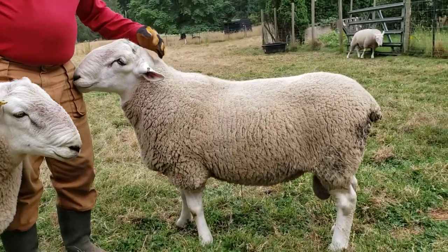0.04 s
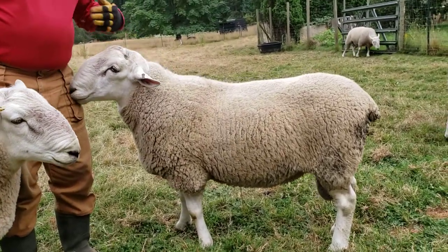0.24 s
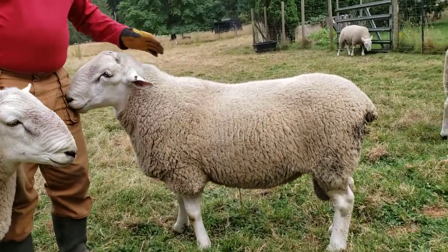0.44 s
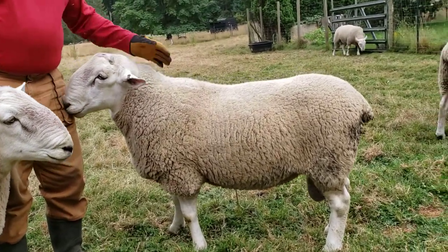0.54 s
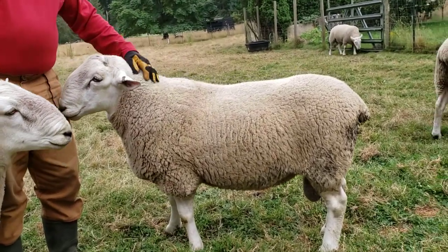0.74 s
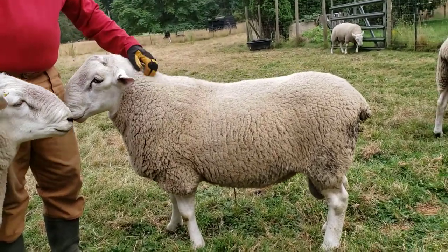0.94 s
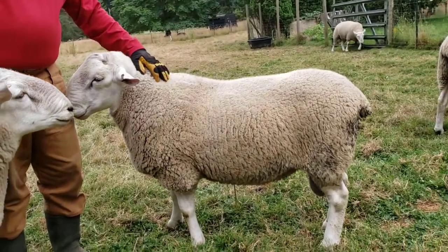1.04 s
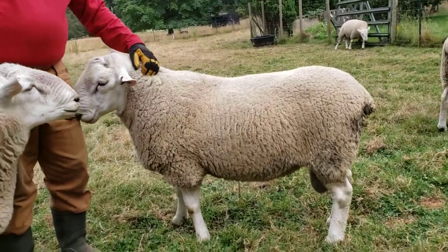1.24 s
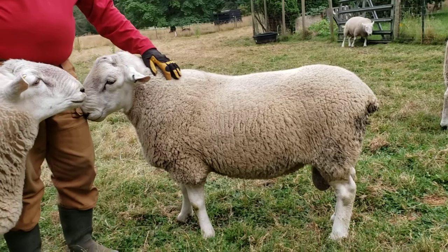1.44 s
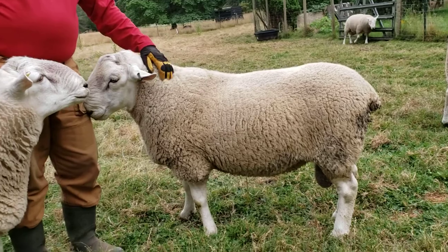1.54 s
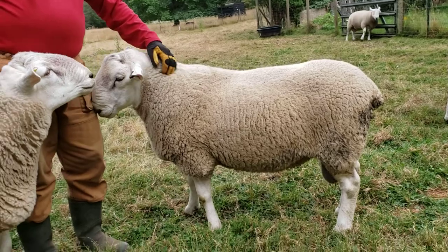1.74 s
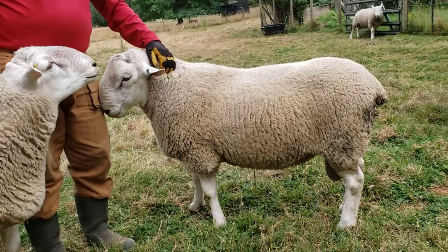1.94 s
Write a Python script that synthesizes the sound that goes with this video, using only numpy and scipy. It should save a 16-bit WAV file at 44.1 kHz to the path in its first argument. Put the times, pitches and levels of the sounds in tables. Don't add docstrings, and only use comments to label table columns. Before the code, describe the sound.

A few metres from a phone in a pasture, pellets rattle in a jostled bucket: one sharp jolt, a quiet gap, another short burst, a tiny tag tick, a hoof click and a faint final slide.

```python
import sys
import numpy as np
from scipy import signal
from scipy.fft import rfft, irfft, next_fast_len
from scipy.io import wavfile
from scipy.ndimage import uniform_filter1d

SR = 44100
rng = np.random.default_rng(int(sys.argv[2]) if len(sys.argv) > 2 else 0)


def digitize_waveform(pressure):
    field = np.atleast_2d(pressure).T
    bounded = np.clip(field, -1, 1)
    quanta = np.round(bounded * 32767).astype(np.int16)
    wavfile.write(sys.argv[1], SR, quanta)


def undo_db(level):
    steps = np.asarray(level, float) / 20
    return 10 ** steps


N = 88200
M = next_fast_len(2 * N)
F = np.maximum(np.arange(M // 2 + 1) * SR / M, 1)

# (frequency [Hz], left over right [dB], left lead [rad], likeness [0-1])
PORTS = [(150, -1.8, -.1, .85), (750, -1.5, -.2, .95), (1150, 7.5, -.5, .85), (1650, 2.5, -1.9, .85),
         (2400, -4.5, -2.3, .85), (3700, -1, -1.9, .75), (5000, 4, -1.6, .5), (10300, 3, -4.1, .55),
         (13000, -5.5, -4.7, .45)]


def unit(x):
    return x / np.sqrt(np.mean(x ** 2))


def curve(table, col=1):
    a = np.array(table, float)
    return np.interp(np.log(F), np.log(a[:, 0]), a[:, col])


def shape(x, h):
    return irfft(rfft(x, M) * h, M)[..., :N]


def ring(modes):
    h = 0
    for k, (hz, width_hz, db) in enumerate(modes):
        h = h + (-1) ** k * undo_db(db) / (1 + 1j * (F - hz ** 2 / F) / max(width_hz, 10))
    return unit(np.abs(h)) * np.exp(1j * np.angle(h))


def walk(rate_hz):
    k = int(SR / rate_hz)
    steps = np.repeat(rng.standard_normal(N // k + 1), k)
    return unit(uniform_filter1d(uniform_filter1d(steps, k), k)[:N])


def air_hiss(t):
    # (frequency [Hz], density [dB per Hz])
    hiss_db = [(200, -12.5), (690, -20), (1150, -12.5), (1810, -18.5), (5600, -19), (7600, -17.5),
               (9600, -31.5), (14500, -24.5)]
    hiss = 0
    for hz in 250 * 2 ** np.arange(0, 6.5, .5):
        band = undo_db(curve(hiss_db)) * np.exp(-(np.log2(F / hz) / 0.5) ** 2)
        hiss = hiss + shape(rng.standard_normal((3, N)), band) * undo_db(1.46 * walk(5.83))
    hiss = hiss[1:] + shape(hiss[0], 500 / (F + 200))
    lull_s, lull_half_s, lull_db = 1.02, 0.19, -5
    return undo_db(-68.5 + lull_db * np.exp(-((t - lull_s) / lull_half_s) ** 2)) * unit(hiss)


def rumble():
    # (frequency [Hz], density [dB per Hz])
    rumble_db = [(12, -41), (20, -66), (37, -12.5), (80, -5), (109, -3.5), (141, -11), (198, -13),
                 (225, -22.5), (400, -36), (520, -64), (880, -120)]
    level_db, side_db = -62, -11
    mid, side = shape(rng.standard_normal((2, N)), undo_db(curve(rumble_db)) * np.exp(-(F / 500) ** 2))
    both = mid * np.array([[.9], [1.1]]) + undo_db(side_db) * side * np.array([[1], [-1]])
    return undo_db(level_db) * unit(both)


def engine(t):
    # (time [s], frequency [Hz], level [dB])
    track = [(0.0, 90.3, -85), (0.099, 90.6, -54.5), (0.271, 87.2, -68), (0.29, 82.8, -65),
             (0.4, 87.28, -64), (1.35, 83.17, -64), (1.37, 83.4, -94), (1.42, 81.8, -54),
             (1.62, 83.44, -69.5), (1.699, 78.6, -63.5), (1.98, 78, -85), (2.0, 81, -67)]
    # (multiple of the drone [1], level [dB])
    partials = [(1, -1), (1.704, -11)]
    wobble_db, hum_hz, hum_db = 5, 229.4, -77.5
    s, hz, level_db = np.array(track).T
    turn = 2 * np.pi * np.cumsum(np.interp(t, s, hz) * (1 + 0.0184 * walk(8.6))) / SR
    drone = 0
    for k, db in partials:
        gain = undo_db(db + np.interp(t, s, level_db) + wobble_db * np.tanh(walk(22.3)))
        drone = drone + gain * np.sqrt(2) * np.sin(k * turn)
    hum = undo_db(hum_db + np.tanh(walk(10.2))) * np.sin(2 * np.pi * hum_hz * t + 0.91 * walk(3.1))
    return drone + hum


def pellets():
    pellets_per_s, scatter_db, sand = 3500, 2, 1.1
    draw = rng.random((3, N))
    size = undo_db(-scatter_db * np.log(draw[1] + 1e-9)) * np.sign(draw[2] - .5)
    return unit(unit(size * (draw[0] < pellets_per_s / SR)) + sand * rng.standard_normal(N))


def streams():
    clump_db, clumps_per_s = 2, 400
    return np.array([pellets() for _ in range(3)]) * unit(undo_db(clump_db * np.tanh(walk(clumps_per_s))))


def effort(t, table, col, t60_s, rise_s):
    power = 0
    for row in table:
        u = t - row[0]
        env = np.clip(u / rise_s, 0, 1) ** 2 * undo_db(-60 * np.clip(u - row[1], 0, None) / t60_s)
        power = power + (env * undo_db(row[col])) ** 2
    return np.sqrt(power)


def bucket(t):
    # (time [s], length [s], rattle [dB], shell [dB], hiss [dB])
    jolts = [(0.001, 0.031, -62.5, -62.5, -80), (0.084, 0.055, -65, -70, -69.5),
             (0.1403, 0.014, -34, -42.5, -38.5), (0.149, 0.016, -37, -38.5, -44),
             (0.168, 0.016, -35.5, -39.5, -44.5), (0.179, 0.0048, -56, -42, -59),
             (0.212, 0.03, -50.5, -50, -85), (0.243, 0.05, -51.5, -55, -61),
             (0.308, 0.083, -62.5, -77, -76), (0.396, 0.067, -58, -63, -76),
             (0.807, 0.019, -59.5, -62, -74.5), (0.837, 0.044, -70.5, -65.5, -80),
             (1.12, 0.018, -77.5, -115, -76), (1.186, 0.041, -66.5, -77, -74),
             (1.265, 0.023, -66, -76, -71), (1.28, 0.013, -57, -62.5, -52),
             (1.298, 0.035, -58.5, -60.5, -71), (1.3338, 0.014, -42, -47.5, -44),
             (1.379, 0.019, -38.5, -41, -46.5), (1.417, 0.0045, -38.5, -41.5, -43.5),
             (1.473, 0.012, -46.5, -49.5, -55.5), (1.53, 0.012, -58, -59, -61.5),
             (1.589, 0.17, -69, -73.5, -98), (1.792, 0.018, -62.5, -74, -78),
             (1.811, 0.16, -67.5, -71, -73.5)]
    release_t60_s = (.16, .2, .07)
    # (frequency [Hz], width [Hz], level [dB])
    rattle = [(2250, 300, -6.5), (2950, 150, -5), (3280, 200, -7), (3700, 500, -10), (4300, 350, -9),
              (4750, 300, -9), (5300, 250, -10), (5800, 300, -8), (6150, 250, -11), (6800, 400, -18),
              (7500, 450, -13)]
    # (frequency [Hz], width [Hz], level [dB])
    shell = [(420, 300, -25), (636.5, 42, -14.5), (813, 62, -7.5), (1091.5, 53, -1.5), (1274, 100, -2),
             (1325, 69, 0.5), (1464, 52, 1), (1566, 138, -1), (1825, 250, -5)]
    # (frequency [Hz], width [Hz], level [dB])
    hiss = [(9200, 2100, -8), (11680, 1650, 0.5), (13400, 910, 0.5), (13960, 1000, -9.5), (15100, 300, -2)]
    body = 0
    for k, modes in enumerate((rattle, shell, hiss)):
        drive = effort(t, jolts, 2 + k, release_t60_s[k], rise_s=0.0046)
        body = body + shape(streams() * drive, ring(modes))
    return body


def ports(x):
    dip_hz, dip_width_hz, dip = 2620, 200, .8
    alike = np.clip(curve(PORTS, col=3), 0, 1)
    half = undo_db(curve(PORTS) / 2) * np.exp(.5j * curve(PORTS, col=2))
    x = shape(x, 1 - dip * np.exp(-((F - dip_hz) / dip_width_hz) ** 2))
    return np.array([shape(x[0], g * np.sqrt(alike)) + shape(x[k], g * np.sqrt(1 - alike))
                     for k, g in ((1, half), (2, 1 / half))])


def echo(x, t):
    # (frequency [Hz], T60 [s], level [dB])
    bands = [(465, 0.16, -66), (1110, 1, 7.5), (2750, 0.78, 2), (3860, 0.91, 7.5), (6500, 1, -8.5),
             (9400, 0.99, 1), (14000, 0.15, 11.5)]
    level_db, start_s, likeness = -9.5, 0.0098, 0.094
    tail = 0
    for hz, t60_s, db in bands:
        band = shape(rng.standard_normal((3, N)), np.exp(-(np.log(F / hz) / .5) ** 2))
        env = undo_db(db - 60 * t / t60_s) * np.clip(t / start_s, 0, 1)
        tail = tail + unit(band) * np.sqrt(hz / t60_s) * env
    tail = likeness * tail[0] + tail[1:]
    side = undo_db(np.array([[1], [-1]]) * curve(PORTS) / 2)
    return undo_db(level_db) * shape(x, side * rfft(tail / np.sqrt(np.sum(tail ** 2) / 2), M))


def brushes(t):
    # (time of peak [s], half length [s], frequency [Hz], level [dB])
    swells = [(0.017, 0.069, 14000, -70), (0.471, 0.049, 10500, -69.5), (0.514, 0.024, 325, -73.5),
              (0.747, 0.042, 7750, -76), (0.923, 0.018, 287, -70), (1.004, 0.048, 9500, -78.5),
              (1.078, 0.057, 311, -72.5), (1.15, 0.13, 14700, -75), (1.278, 0.021, 14500, -64),
              (1.64, 0.14, 15100, -75), (1.722, 0.018, 6330, -69), (1.943, 0.35, 7250, -81),
              (0.207, 0.07, 335, -69), (0.535, 0.078, 876, -75.5), (1.517, 0.038, 880, -65),
              (0.487, 0.16, 3380, -67.5)]
    width = 0.32
    out = 0
    for s, half_s, hz, db in swells:
        n = unit(shape(rng.standard_normal((2, N)), np.exp(-(np.log(F / hz) / width) ** 2)))
        n = n[0] + min(hz / 1500, 1) * n[1] * np.array([[1], [-1]])
        out = out + undo_db(db) * np.exp(-((t - s) / half_s) ** 2) * n
    return out


def panel_notes(t):
    # (time [s], length [s], frequency [Hz], level [dB])
    panels = [(0.144, 0.0086, 1325, -41), (0.144, 0.011, 5900, -48), (0.1495, 0.0034, 3670, -34),
              (0.158, 0.023, 2232, -41), (0.160, .009, 1500, -41), (0.174, 0.0056, 3698, -27.5),
              (0.174, .018, 1106, -42), (0.183, 0.0069, 3690, -34.5), (0.185, .008, 1500, -47),
              (0.192, 0.0092, 4030, -38), (0.250, .06, 1110, -54.5), (0.810, 0.013, 3660, -54),
              (0.811, 0.0065, 5800, -60), (0.824, 0.011, 3920, -66), (0.833, 0.025, 1360, -68.5),
              (0.845, 0.033, 810, -71), (1.190, 0.056, 1550, -71), (1.275, 0.0044, 5700, -64),
              (1.288, 0.029, 1338, -61.5), (1.338, 0.0087, 1622, -46), (1.341, 0.0043, 3704, -41.5),
              (1.350, 0.0042, 4040, -42), (1.352, 0.0027, 5500, -44.5), (1.359, 0.0055, 3940, -49),
              (1.387, 0.0092, 1380, -45), (1.388, 0.034, 3730, -43.5), (1.391, .010, 2890, -43.5),
              (1.405, 0.0071, 3730, -46), (1.427, 0.0049, 1537, -39), (1.428, .006, 3110, -45.5),
              (1.478, 0.0076, 1510, -57), (1.478, 0.011, 2940, -50.5), (1.797, 0.042, 3480, -66),
              (1.805, 0.014, 5540, -64.5), (1.815, 0.033, 1096, -65.5), (1.862, 0.026, 1102, -65),
              (1.93, 0.063, 1183, -72), (1.339, 0.019, 1990, -51), (1.384, 0.018, 2134, -58.5),
              (1.422, 0.005, 2270, -46), (0.843, 0.022, 1013, -69.5), (0.022, 0.11, 1438, -72)]
    rise_s, t60_s, waver_rad, flutter_db = 0.0027, 0.027, 1.2, 1
    waver = waver_rad * np.array([walk(300) for _ in range(3)])
    flutter = undo_db(flutter_db * np.tanh([walk(250) for _ in range(4)]))
    start = 2 * np.pi * rng.random((len(panels), 3, 1))
    out = np.zeros((3, N))
    for k, (s, length_s, hz, db) in enumerate(panels):
        i = slice(int(s * SR), int((s + length_s + 2 * t60_s) * SR))
        u = np.maximum(t[i] - s, 0)
        env = np.clip(u / rise_s, 0, 1) * undo_db(db - 60 * np.clip(u - length_s, 0, None) / t60_s)
        note = np.sin(2 * np.pi * hz * u + waver[:, i] + start[k])
        out[:, i] += np.sqrt(2) * env * flutter[k % 4, i] * note
    return out


def rim_knocks(t):
    # (time [s], length [s], level [dB])
    knocks = [
        (0.049, 0.013, -65.5),
        (0.150, 0.0037, -59),
        (0.174, .006, -36),
        (0.197, 0.014, -52),
        (0.807, 0.021, -61.5),
        (1.135, 0.0094, -68.5),
        (1.191, 0.034, -65),
        (1.292, 0.061, -56),
        (1.343, 0.0095, -39.5),
        (1.38, 0.011, -49),
    ]
    # (frequency [Hz], width [Hz], level [dB])
    modes = [(3680, 170, 0), (5800, 300, -13), (7500, 350, -17)]
    knock_s, t60_s, strike_db = .003, .045, 23
    blows = np.zeros(N)
    blows[[int((s + knock_s / 2) * SR) for s, _, _ in knocks]] = undo_db(strike_db + np.array(knocks)[:, 2])
    rattle = streams() * effort(t, knocks, 2, t60_s, rise_s=knock_s)
    return shape(rattle + blows, ring(modes))


def ear_tags(t):
    # (time [s], frequency [Hz], level [dB], decay [s])
    ticks = [
        (0.444, 10000, -72, 0.023),
        (1.03, 9700, -113, .012),
        (1.534, 10120, -48.5, 0.0064),
    ]
    out = 0
    for s, hz, db, decay_s in ticks:
        env = np.clip((t - s) / 0.003, 0, 1) * np.exp(-np.clip(t - s, 0, None) / decay_s)
        squeak = unit(shape(rng.standard_normal(N), ring([(hz, 300, 0)]) ** 2))
        out = out + undo_db(db) * env * squeak
    return out * np.array([[1.6], [-.5]])


def hoof_tick(t):
    # (frequency [Hz], width [Hz], level [dB])
    modes = [(1000, 500, -3), (1550, 600, 0)]
    tick_s, half_s, level_db = 1.6595, .00007, -47.5
    push = undo_db(level_db) * np.exp(-((t - tick_s) / half_s) ** 2)
    return shape(push, ring(modes)) * np.array([[1.2], [.8]])


def scene():
    t = np.arange(N) / SR
    field = air_hiss(t) + rumble() + engine(t)
    body, notes, rim = bucket(t), panel_notes(t), rim_knocks(t)
    around = field + brushes(t) + ear_tags(t) + hoof_tick(t)
    echoed = body[0] + 0.47 * rim[0] + 0.32 * notes[0]
    return ports(body + rim + notes) + echo(echoed, t) + around


def band_limit(x):
    return signal.sosfilt(signal.butter(12, 15850, fs=SR, output="sos"), x)


def record(dry):
    top_hz, slope_hz = 15850, 60
    heard = shape(dry, np.clip((top_hz - F) / slope_hz, 0, 1))
    return band_limit(heard)


dry = scene()
out = record(dry)
digitize_waveform(out)
```